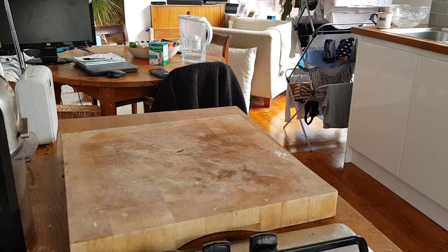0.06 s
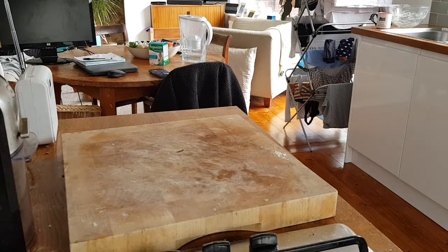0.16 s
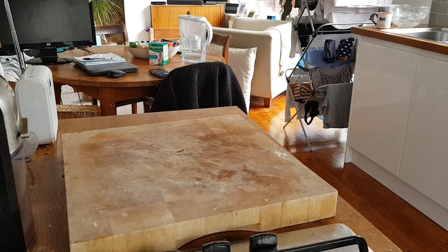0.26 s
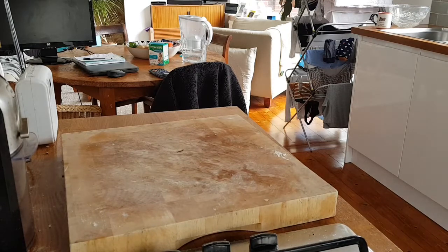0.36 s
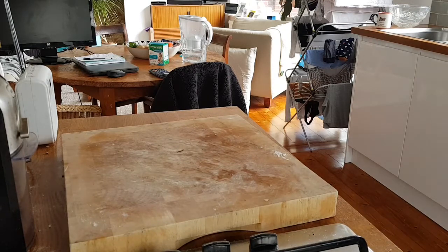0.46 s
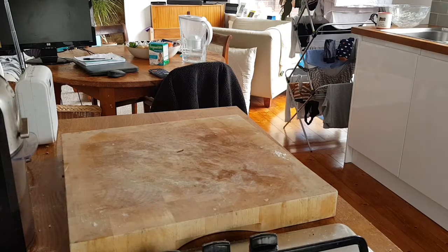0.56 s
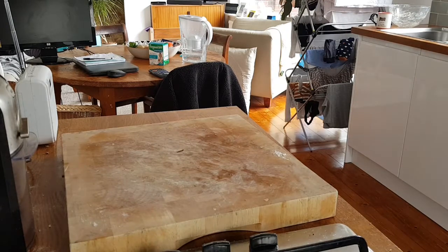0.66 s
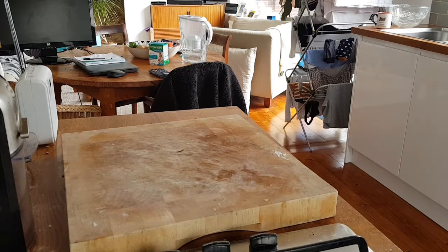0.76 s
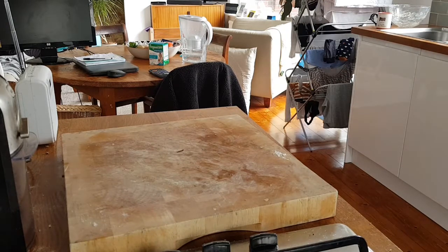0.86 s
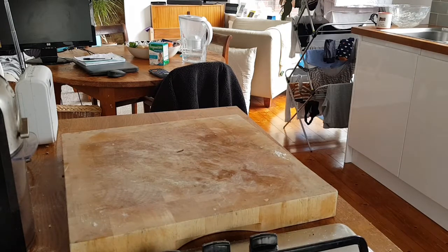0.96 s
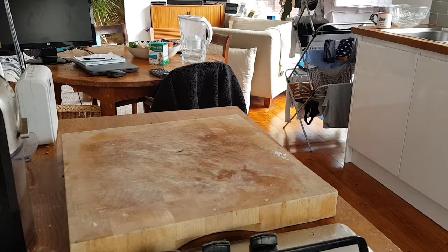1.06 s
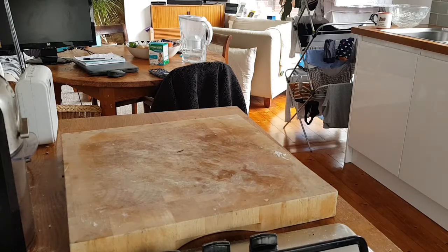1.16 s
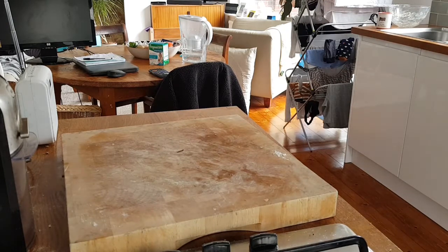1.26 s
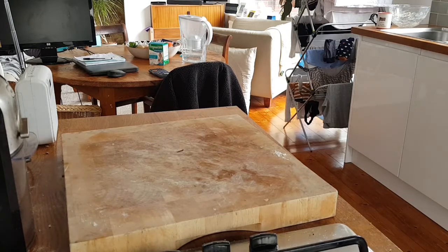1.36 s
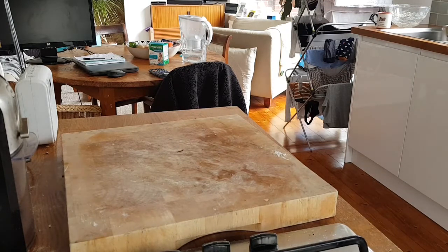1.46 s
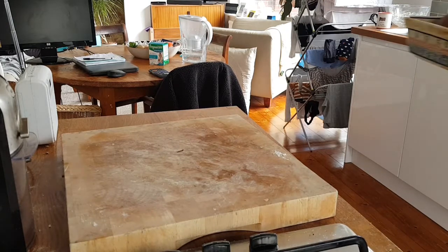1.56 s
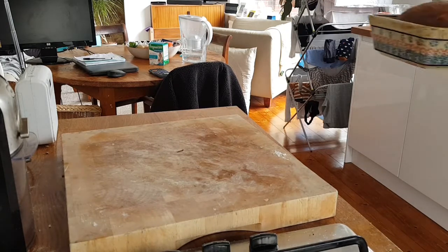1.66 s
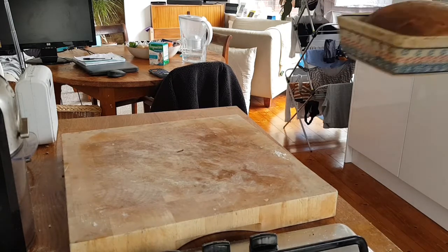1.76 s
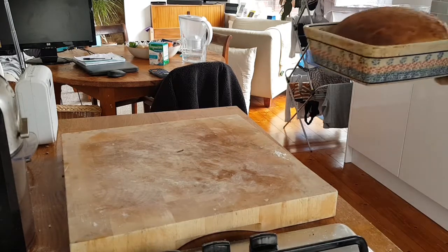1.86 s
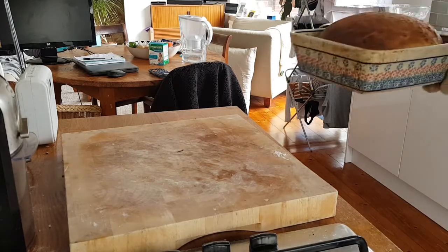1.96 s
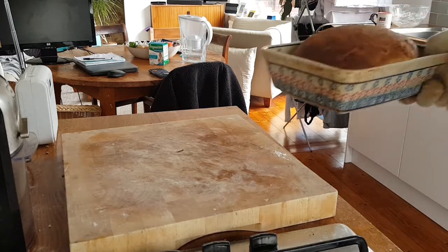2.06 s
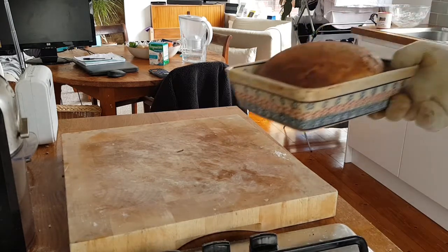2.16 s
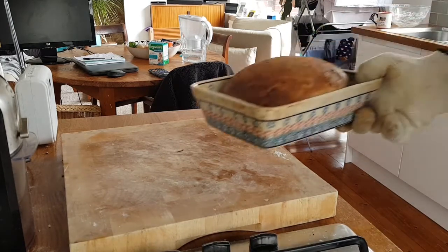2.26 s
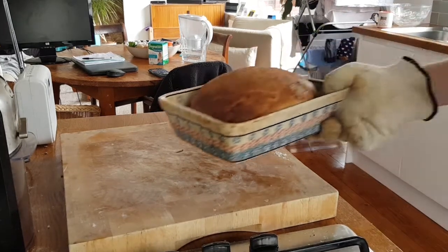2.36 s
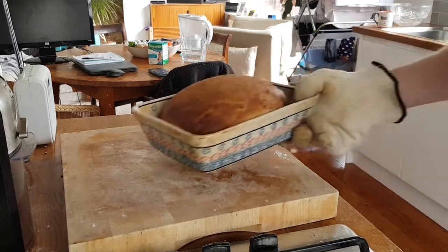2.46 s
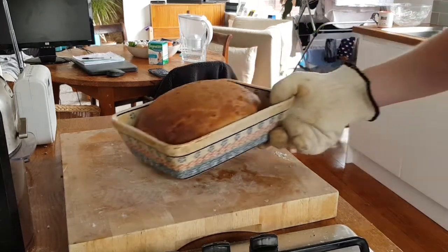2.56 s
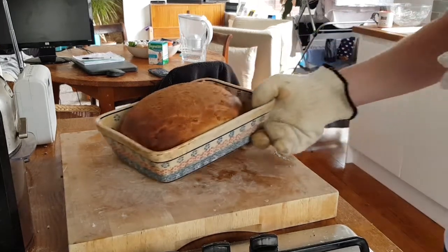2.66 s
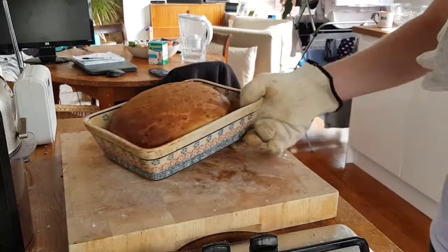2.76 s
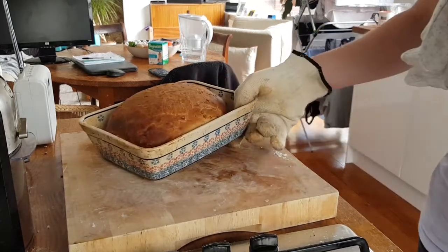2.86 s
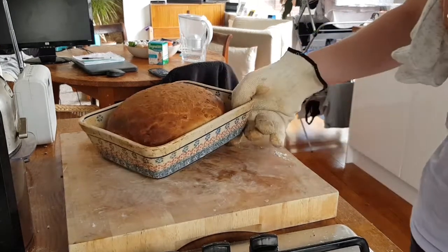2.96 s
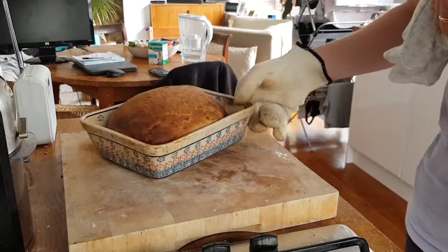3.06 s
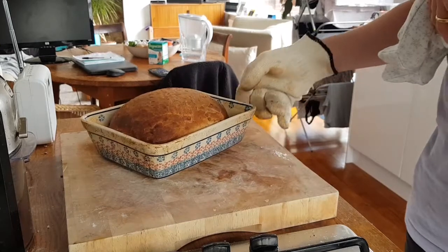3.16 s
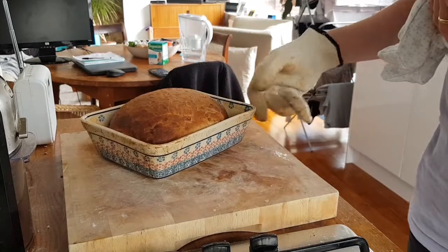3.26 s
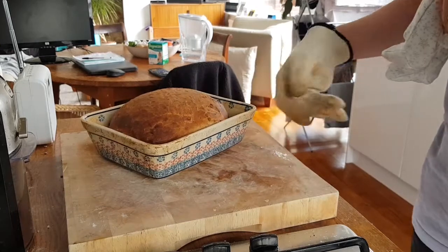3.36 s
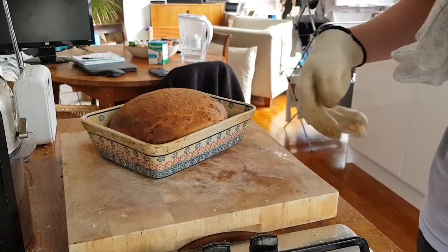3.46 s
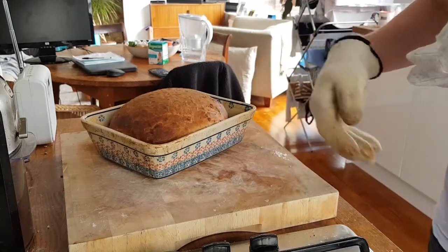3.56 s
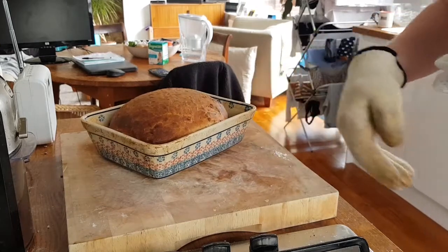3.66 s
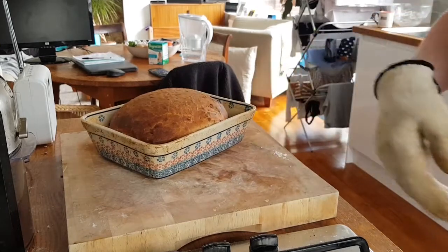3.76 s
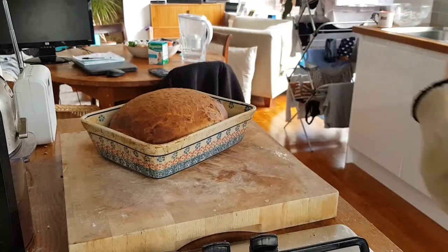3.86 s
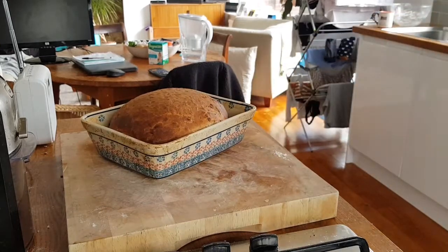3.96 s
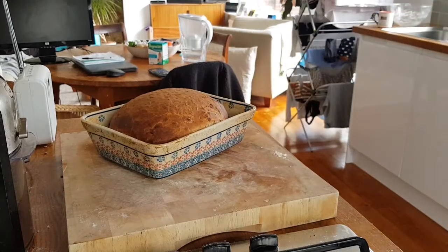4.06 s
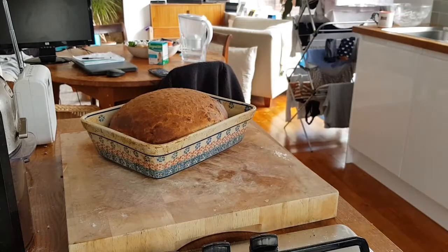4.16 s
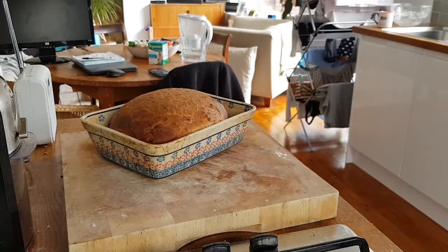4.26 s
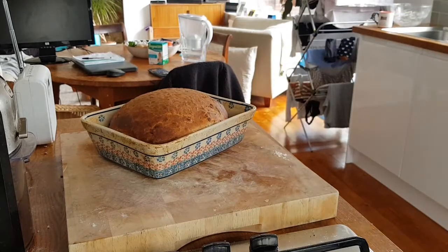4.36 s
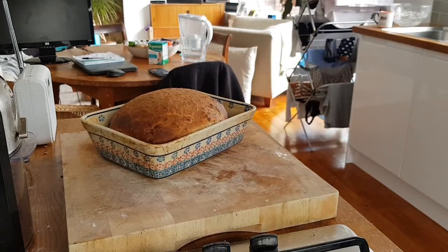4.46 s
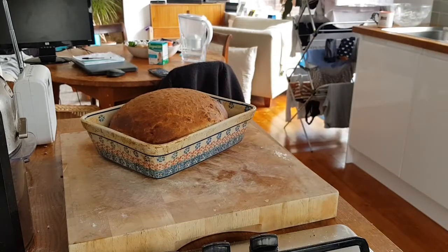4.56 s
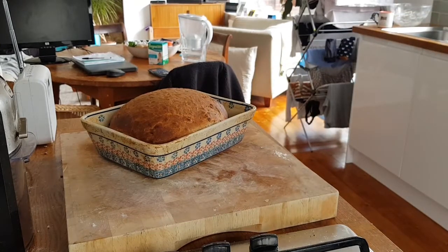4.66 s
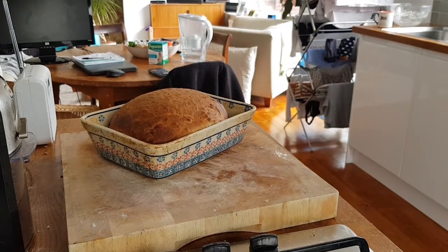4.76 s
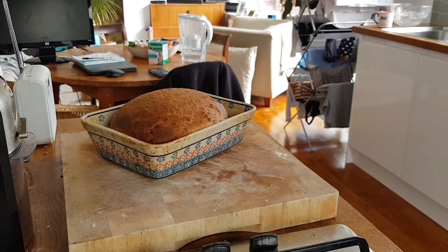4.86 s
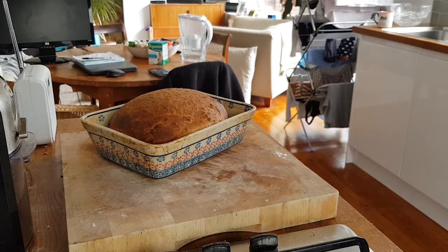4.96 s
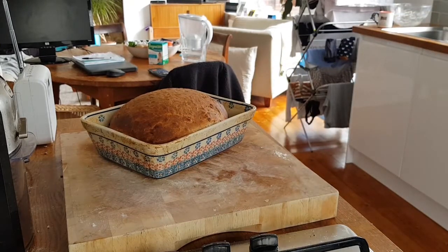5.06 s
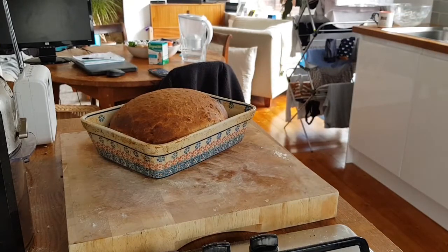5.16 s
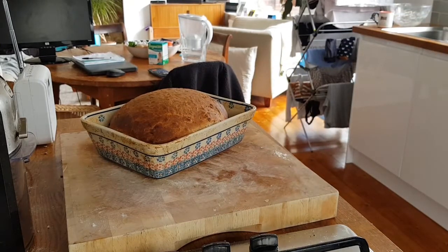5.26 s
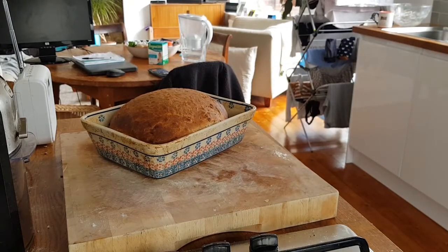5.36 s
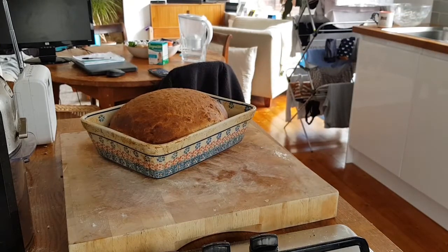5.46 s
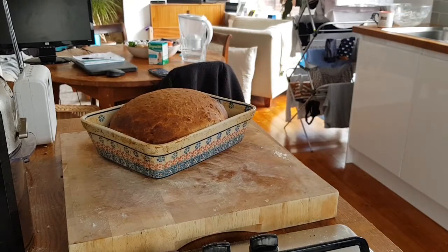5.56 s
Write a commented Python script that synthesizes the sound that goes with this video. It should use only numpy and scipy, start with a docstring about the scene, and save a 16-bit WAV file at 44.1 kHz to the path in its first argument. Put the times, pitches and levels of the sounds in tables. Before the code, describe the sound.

Soft steps and rustling clothes, then a dull knock and a sharp clatter as a ceramic dish lands on thick wood.

```python
"""In a small kitchen an appliance hums and clothes rustle. Soft steps and bumps thump the wooden floor,
with brushing soles, swishes of cloth and faint squeaks. An oven glove crackles by stick-slip friction
on a ceramic loaf dish. One corner of the dish knocks dully on a thick wooden board and drags; then the
base drops flat and chatters, exciting the modes of dish, board and room, and something metal sings on.
The gain control ducks at this clatter and recovers slowly under the last steps and swishes."""
import sys
import numpy as np
from scipy import signal
from scipy.fft import rfft, irfft, next_fast_len
from scipy.io import wavfile
from scipy.ndimage import uniform_filter1d, minimum_filter1d

SR = 44100
rng = np.random.default_rng(int(sys.argv[2]) if len(sys.argv) > 2 else 0)


def wrap_up_sound(samples):
    """Save the sound to the file named by the first command line argument, as 16-bit audio."""
    columns = np.atleast_2d(samples).T
    # keep every value between -1 and 1, then stretch to whole-number steps
    tamed = np.clip(columns, -1, 1)
    steps = np.round(tamed * 32767).astype(np.int16)
    wavfile.write(sys.argv[1], SR, steps)


N = 247886
T = np.arange(N) / SR
RING = T[:2 * SR // 3]  # time axis of one short event

# footfalls and bumps, levels relative: (time [s], thump [dB], brightness [Hz], boom [dB], brush [dB])
FOOTFALLS = [(.160, -39, 873, -49, -69.5), (.563, -38.5, 1027, -41.5, -44), (.668, -33, 1076, -55, -57),
             (.708, -30.5, 1319, -42, -47.5), (1.213, -36, 1589, -49, -44), (1.290, -37, 1400, -52, -51),
             (1.416, -35.5, 1593, -41.5, -40.5), (1.530, -21.5, 1642, -64, -47),
             (1.586, -20, 2890, -52, -40), (1.971, -38.5, 1608, -60, -45), (2.156, -27, 842, -39.5, -43),
             (2.445, -33, 558.6, -39, -45), (4.118, -35.5, 699, -41.5, -53.5),
             (4.765, -19, 1900, -35.5, -52), (4.969, -39.5, 748, -58.5, -54)]
# friction spectrum of cloth and soles: (frequency [Hz], level [dB])
FRICTION_SPECTRUM = [(150, -7.5), (500, 4), (1500, -1.5), (3500, -0.5), (7000, -4), (12000, -1),
                     (16000, -11)]
# the dish's weight coming down on the counter: (time [s], relative level [dB])
DISH_LANDINGS = [(2.731, -26.5), (3.196, -10)]


def undb(db):
    """Decibels to amplitude ratio."""
    return 10 ** (np.asarray(db) / 20)


def at(points, hz):
    """Interpolate (frequency [Hz], value) points on a log-frequency axis."""
    f, v = np.transpose(points)
    return np.interp(np.log(hz + 1), np.log(f), v)


def padded(x):
    """Even length, at least that of x, with a fast Fourier transform."""
    return 2 * next_fast_len((x.shape[-1] + 1) // 2)


def freqs(x):
    """Frequencies of the spectrum of x."""
    return np.fft.rfftfreq(padded(x), 1 / SR)


def unit(x):
    """Normalise to rms 1."""
    return x / np.sqrt(np.mean(x ** 2))


def weigh(x, gain):
    """Filter by multiplying the spectrum by a gain."""
    return irfft(rfft(x, padded(x)) * gain)[..., :x.shape[-1]]


def shape(x, db):
    """Minimum-phase filter with the given gain at each frequency, by way of the cepstrum."""
    cepstrum = irfft(np.log(undb(db)))
    half = len(cepstrum) // 2
    cepstrum[1:half] *= 2
    cepstrum[half + 1:] = 0
    return weigh(x, np.exp(rfft(cepstrum)))


def lowpass_db(hz, corner_hz, order=2):
    """Low-pass law of a soft contact: a longer push holds less treble."""
    return -10 * np.log10(1 + (hz / corner_hz) ** (2 * order))


def whiten(x, width_hz):
    """Spectral whitening: level the broad humps, keep the fine peaks; energy 1."""
    power = np.mean(abs(rfft(x, padded(x))) ** 2, axis=0)
    bins = int(width_hz * padded(x) / SR) + 1
    return weigh(x, uniform_filter1d(power, bins) ** -.5)


def waver(rate_hz):
    """Smooth random fluctuation of rms 1."""
    k = int(SR / rate_hz)
    stairs = np.repeat(rng.standard_normal(N // k + 1), k)
    return unit(uniform_filter1d(uniform_filter1d(stairs, k), k)[:N])


def add(out, s, x):
    """Superpose x from time s."""
    i = max(int(s * SR), 0)
    out[..., i:i + x.shape[-1]] += x[..., :N - i]


def diffuse(t):
    """Diffuse-field noise at two close microphones: coherent in the bass, unrelated in the treble."""
    # likeness of left and right: (frequency [Hz], correlation)
    coherence = [(100, 1), (300, .75), (650, 0.28), (1300, -0.28), (3000, -0.049), (15000, 0)]
    c = np.clip(at(coherence, freqs(t)), -.99, .99)
    mid, side = weigh(rng.standard_normal((2, len(t))), np.sqrt([1 + c, 1 - c]))
    return unit(np.array([mid + side, mid - side]))


def kitchen(x, wet_db, gap_s):
    """Reverberation: wall reflections build up after the direct sound; their treble dies first."""
    # reverberant bands: (frequency [Hz], t60 [s], relative level [dB])
    bands = [(100, 0.6, -1), (400, 0.41, -4), (800, 0.41, -2.5), (1798, 0.36, -2.5), (4000, 0.36, -1),
             (8000, 0.29, -1), (15000, 0.2, -0.5)]
    centres, t60s, dbs = np.transpose(bands)
    noise, f, tail = diffuse(RING), freqs(RING), 0
    for t60, share in zip(t60s, np.eye(len(bands))):
        band = weigh(noise, at(np.c_[centres, share], f))
        tail = tail + band * np.exp(-np.log(1000) * RING / t60)
    build_up = 1 - np.exp(-(RING / gap_s) ** 2)
    tail = whiten(tail * build_up, width_hz=120) * build_up * (RING < .6)
    response = shape(tail, wet_db + at(np.c_[centres, dbs], f))
    return x + signal.oaconvolve(x, response, axes=-1)[:, :N]


def burst(rise_s, fade_s, colour_db, grain_db):
    """Granular noise: tiny uneven contacts swell, then decay exponentially."""
    swell = np.minimum(RING / rise_s, 1) ** 2 * np.exp(-np.maximum(RING - rise_s, 0) / fade_s)
    grains = unit(undb(grain_db * rng.standard_normal(len(RING))))
    return shape(diffuse(RING) * grains * swell, colour_db) / np.sqrt(np.mean(undb(colour_db) ** 2))


def background(left_db=1):
    """An appliance's hum, modulated in amplitude and phase, lies over the room's low broadband noise."""
    # still air of the kitchen: (frequency [Hz], relative level [dB])
    air_spectrum = [(20, -1.5), (60, -2), (105, 6), (170, -0.5), (260, -10.5), (400, -19), (600, -13.5),
                    (850, -25.5), (1150, -20.5), (1800, -40), (4000, -42.5), (7000, -43.5), (9000, -34.5),
                    (15000, -39.5)]
    # tones of the appliance: (frequency [Hz], level [dB], fluctuation [dB])
    tones = [(102.2, -52.5, 1), (190, -75, -1), (268, -74, 2.5), (467, -79.5, 1)]
    air = undb(-55 + 0.38 * waver(7.8)) * unit(shape(diffuse(T), at(air_spectrum, freqs(T))))
    hum = 0
    for hz, db, waver_db in tones:
        amplitude = np.sqrt(2) * undb(db + waver_db * waver(6.1))
        hum += amplitude * np.sin(2 * np.pi * hz * T + 0.71 * waver(27))
    return (air + hum) * undb([[left_db], [-left_db]])


def rustle(far_db=-74, near_db=-63, nearest_s=2.15, approach_s=0.69, flutter_db=1.1, grain_db=4):
    """Friction of cloth on cloth, louder as the cook comes near and fainter with distance."""
    fibres = diffuse(T) * undb(grain_db * rng.standard_normal(N))
    colour = at(FRICTION_SPECTRUM, freqs(T)) - 1.5 * np.log2(1 + freqs(T) / 500)
    nearness = np.exp(-((T - nearest_s) / approach_s) ** 2)
    level_db = far_db + (near_db - far_db) * nearness + flutter_db * waver(31)
    return unit(shape(fibres, colour)) * undb(level_db)


def squeaks(half_width_hz=160):
    """Narrow-band noise is heard as a pitch: brief, faint squeaks."""
    # squeaks: (time [s], relative level [dB], centre frequency [Hz])
    events = [(.130, -65.5, 7120), (.150, -68.5, 9900), (0.563, -52, 2650), (2.449, -51, 13100),
              (4.677, -51.5, 2750)]
    out = np.zeros((2, N))
    for s, db, hz in events:
        band = lowpass_db(freqs(RING) - hz, half_width_hz)
        add(out, s, undb(db) * burst(0.0022, 0.024, band, grain_db=0))
    return out


def soles(rise_cycles=27, peak_cycles=8, fade_s=0.039, tilt_db_per_octave=-3):
    """Sliding friction: each sole starts to brush the floor just before it lands."""
    out, f = np.zeros((2, N)), freqs(RING)
    colour = at(FRICTION_SPECTRUM, f) + tilt_db_per_octave * np.log2(1 + f / 500)
    for s, _, hz, _, db in FOOTFALLS:
        rise_s = rise_cycles / hz
        add(out, s + peak_cycles / hz - rise_s, undb(db) * burst(rise_s, fade_s, colour, grain_db=6))
    return out


def steps(rise_cycles=11, fade_s=0.026):
    """Soft impacts on the floor: the harder the contact, the faster and brighter the thump."""
    # response of the wooden floor: (frequency [Hz], level [dB])
    floor_spectrum = [(40, -14), (90, -2), (135, -1), (280, 4.5), (450, 0.5), (900, -1.5), (2000, -7),
                      (4000, -12), (15000, -16.5)]
    out, f = np.zeros((2, N)), freqs(RING)
    for s, db, hz, _, _ in FOOTFALLS:
        colour = at(floor_spectrum, f) + lowpass_db(f, hz, order=3)
        add(out, s, undb(db) * burst(rise_cycles / hz, fade_s, colour, grain_db=4))
    return kitchen(out, wet_db=0.5, gap_s=0.011) * undb(-13)


def booms(swell_s=0.0053):
    """Steps and landings excite the room's low standing waves, which swell late and linger."""
    # room modes: (frequency [Hz], relative level [dB], t60 [s])
    room_modes = [(65.6, -12.5, 0.36), (90.3, -9, 0.2), (130.44, -0.5, 0.35), (235.5, -15.5, 0.22),
                  (289.4, -12, 0.12)]
    out, swell = np.zeros(N), 1 - np.exp(-RING / swell_s)
    for s, blow_db in DISH_LANDINGS + [(s, boom_db) for s, _, _, boom_db, _ in FOOTFALLS]:
        for hz, db, t60 in room_modes:
            wave = np.sin(2 * np.pi * (hz * RING + rng.random()))
            add(out, s, undb(blow_db + db) * swell * wave * np.exp(-np.log(1000) * RING / t60))
    return 2 * out


def swishes(rise_share=0.33):
    """Sliding friction of cloth sweeping past gives longer, smoother swells of noise."""
    # sweeps of cloth: (peak time [s], relative level [dB], length [s], tilt [dB/octave])
    sweeps = [(1.443, -32, .075, -2.5), (3.116, -57.5, .15, 0), (4.055, -48, .09, -4.5),
              (4.694, -49, 0.11, -2), (5.03, -51.5, .2, 1.4), (5.303, -58, .1, 3)]
    out, f = np.zeros((2, N)), freqs(RING)
    for s, db, length_s, tilt in sweeps:
        rise_s = length_s * rise_share
        colour = at(FRICTION_SPECTRUM, f) + tilt * np.log2(1 + f / 500)
        add(out, s - rise_s, undb(db) * burst(rise_s, length_s - rise_s, colour, grain_db=0.5))
    return out


def glove(rise_s=0.00029, fade_s=0.011):
    """Stick-slip friction: the padded glove crosses the glaze in crackly spurts."""
    # slips of the grip on the rim: (time [s], level [dB], tilt [dB/octave])
    slips = [(2.2772, -41.5, -3.5), (2.2886, -41.5, -8), (2.302, -42, 6), (2.332, -40.5, 0),
             (2.339, -38.5, 18), (2.368, -46.5, -10), (2.404, -45, 5), (2.434, -44, -6)]
    # glove on glaze: (frequency [Hz], relative level [dB])
    slip_spectrum = [(500, -14.5), (3600, -3.5), (4700, 4), (5400, 9), (6200, 2.5), (7200, -3), (10000, -4),
                     (15000, -21.5)]
    out, f = np.zeros((2, N)), freqs(RING)
    for s, db, tilt in slips:
        colour = at(slip_spectrum, f) + tilt * np.log2(1 + f / 4000)
        add(out, s, undb(db) * burst(rise_s, fade_s, colour, grain_db=2.5))
    return kitchen(out, wet_db=-4.5, gap_s=0.0034)


def rebounds(s, db, count=3, gap_s=0.005, shrink=0.8, loss_db=3.5, scatter=0.05):
    """Inelastic collision: a contact repeats, ever sooner and weaker, as (time [s], level [dB])."""
    k = np.arange(count)
    gaps = gap_s * shrink ** k * np.exp(scatter * rng.standard_normal(count))
    return zip(s + np.cumsum(gaps) - gaps, db - loss_db * k)


def ringing(t, spot_db=3):
    """Damped modes after one push; the spot struck decides how much of each upper mode sounds."""
    # modes of board (low) and loaded dish (high): (frequency [Hz], relative level [dB], t60 [s])
    modes = [(180.7, -6, 0.1), (244.3, -13, 0.14), (425, -16, 0.15), (490, -12, 0.091), (579.4, -10, 0.17),
             (647.5, -5.5, 0.05), (675, -3, 0.11), (711, -5, 0.17), (840, -3.5, 0.056), (910, 1, 0.056),
             (1080, -5, 0.25), (1188.5, -1, .21), (1363, 1, 0.06), (1384, -9, 0.21), (1640, -0.5, 0.033),
             (1910, -4.5, 0.072), (1913, -3, 0.17), (2010, -2.5, 0.16), (2108, -8.5, 0.12),
             (2734, -12.5, 0.36), (2910, -10, .09), (3190, -8, 0.096), (3730, -7, .1), (3940, -7.5, 0.092),
             (4120, -12.5, 0.12), (4612, -8.5, .13), (5500, -14.5, 0.12), (6830, -22.5, 0.11),
             (9050, -7, 0.19)]
    hz, db, t60 = np.transpose(modes)[:, :, None]
    waves = np.exp((2j * np.pi * hz - np.log(1000) / t60) * t)
    shortness = np.minimum(hz / 600, 1)
    amplitude = undb(db + spot_db * shortness * rng.standard_normal(hz.shape))
    # short waves reach the two microphones out of step
    phase = np.pi * shortness ** 2 * rng.uniform(-1, 1, (len(hz), 2))
    ring = np.real((amplitude * np.exp(1j * phase)).T @ waves)
    # a small dish radiates no deep bass
    return signal.sosfilt(signal.butter(2, 120, "high", fs=SR, output="sos"), ring)


def dish(modes_db=-29.5, crack_db=11.5, crack_s=0.0045, left_db=0.2):
    """Impulse excitation: each contact is a short push that rings dish and board."""
    # one corner, then the edges of the base: (time [s], relative level [dB], brightness [Hz])
    contacts = [(2.7307, 8, 699), (3.186, 11.5, 6140), (3.2015, 14.5, 3540), (3.2120, 12.5, 6000),
                (3.2214, 9, 6660), (3.2490, -2.5, 2400)]
    # dense, quickly damped modes of wood and clay: (frequency [Hz], relative level [dB])
    crack_spectrum = [(25, -36.5), (55, -18.5), (130, -10.5), (300, 2), (700, 7), (1000, 5.5), (1900, 8),
                      (3000, -1), (4300, -1), (6000, -12.5), (9000, -12), (15000, -10.5)]
    t = RING[:len(RING) // 2]
    f, out = freqs(t), np.zeros((2, N))
    for first_s, first_db, hz in contacts:
        for s, db in rebounds(first_s, first_db):
            push_db = db + np.maximum(lowpass_db(f, hz, order=3), -46)
            crack = whiten(diffuse(t) * np.exp(-t / crack_s), width_hz=350) * (t < .1)
            body = shape(crack, crack_db + at(crack_spectrum, f)) + undb(modes_db) * ringing(t)
            add(out, s, shape(body, push_db))
    return kitchen(out, wet_db=-2, gap_s=0.0031) * undb([[left_db], [-left_db]])


def metal(hz=500.6, coupling_db=-43, t60=2.1):
    """Sympathetic vibration: something metal on the counter takes up each landing and sings on."""
    out = np.zeros(N)
    ring = np.sin(2 * np.pi * hz * T) * np.exp(-np.log(1000) * T / t60)
    for s, db in DISH_LANDINGS:
        add(out, s, undb(db + coupling_db) * ring)
    return out


def drags():
    """Sliding friction: tilted on one corner, the dish creeps over the board."""
    # slides of the unglazed foot: (time [s], level [dB], rise [s], fade [s])
    slides = [(2.764, -58, .01, 0.095), (2.844, -64, .015, 0.14), (3.073, -52.5, .025, 0.069)]
    # clay rubbing on wood: (frequency [Hz], relative level [dB])
    drag_spectrum = [(500, -15), (1700, -5), (2300, -2), (2800, 2), (3500, -11.5), (4500, -6.5),
                     (7000, -15), (15000, -26)]
    out, colour = np.zeros((2, N)), at(drag_spectrum, freqs(RING))
    for s, db, rise_s, fade_s in slides:
        add(out, s, undb(db) * burst(rise_s, fade_s, colour, grain_db=4))
    return kitchen(out, wet_db=-2, gap_s=0.0059)


def microphones(x, lag_s=0.00034, bass_hz=450, left_db=0.08):
    """Phase delay: bass reaches the left microphone a little later and stronger."""
    f = freqs(x)
    bass = 1 / (1 + (f / bass_hz) ** 4)
    left_gain = undb(left_db * bass) * np.exp(-2j * np.pi * f * lag_s * bass)
    return np.array([weigh(x[0], left_gain), x[1]])


def scene():
    """Superposition of all the kitchen's sources at two microphones."""
    dish_and_steps = dish() + booms() + metal() + drags() + steps()
    scuffs = kitchen(soles() + swishes() + squeaks(), wet_db=-5, gap_s=0.0027) * undb(-3.5)
    return microphones(dish_and_steps + scuffs + rustle() + glove() + background())


def gain_control(x, ceiling_db=-10, hold_s=0.85, release_db_per_s=11):
    """Automatic gain control: loud sound pushes the gain down at once; it is held, then creeps back."""
    power = uniform_filter1d(np.mean(x ** 2, axis=0), size=256)
    level_db = 10 * np.log10(np.maximum(power, 1e-12))
    span = 2 * int(hold_s * SR / 2) + 1
    held = minimum_filter1d(np.minimum(ceiling_db - level_db, 0), span, origin=span // 2, mode="constant")
    creep = release_db_per_s * T
    gain_db = np.minimum.accumulate(held - creep) + creep
    return x * undb(uniform_filter1d(gain_db, size=64))


def record(dry):
    """Limiting: the phone rides its gain, clips short of full scale and cuts the top of the band."""
    limited = np.clip(gain_control(dry), -.9, .9)
    return signal.sosfilt(signal.ellip(10, .2, 70, 15700, fs=SR, output="sos"), limited)


dry = scene()
out = record(dry)
wrap_up_sound(out)
```